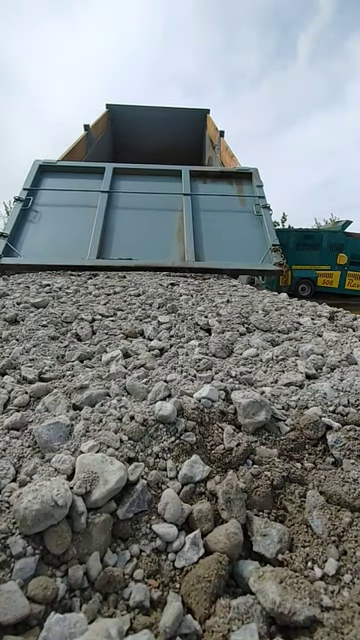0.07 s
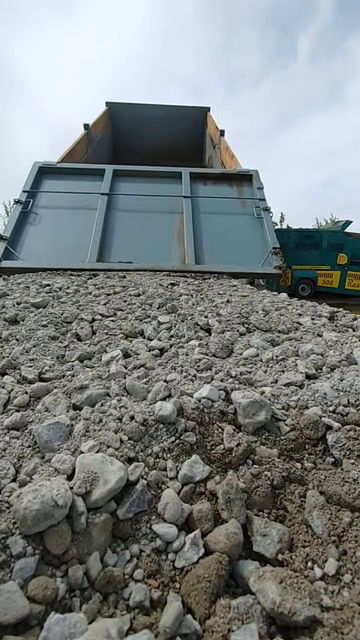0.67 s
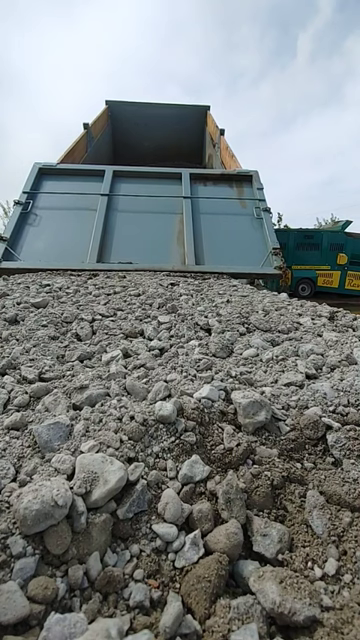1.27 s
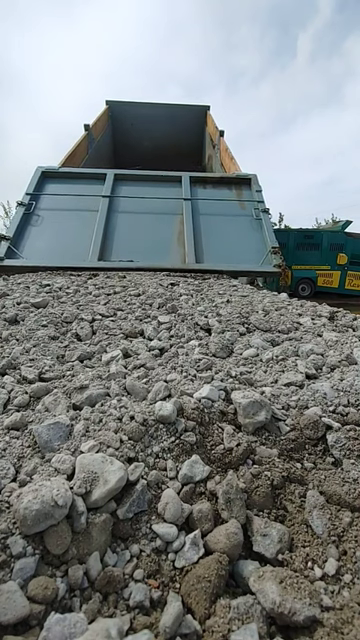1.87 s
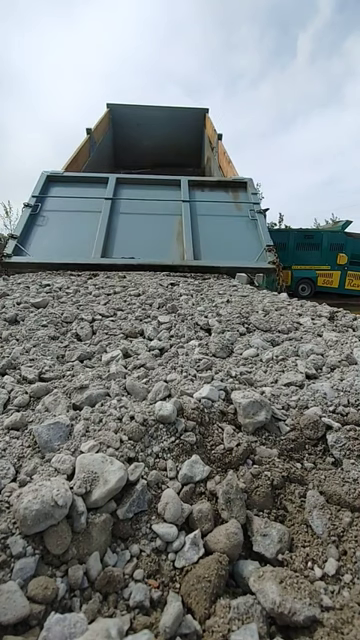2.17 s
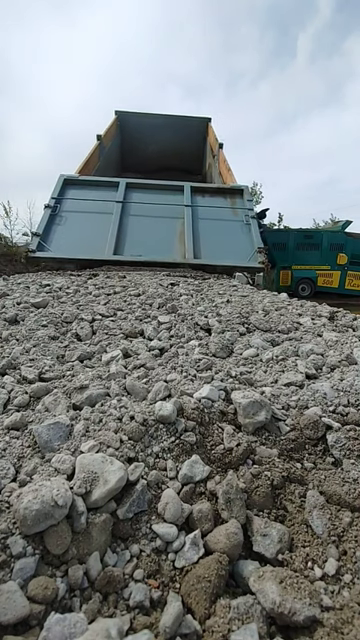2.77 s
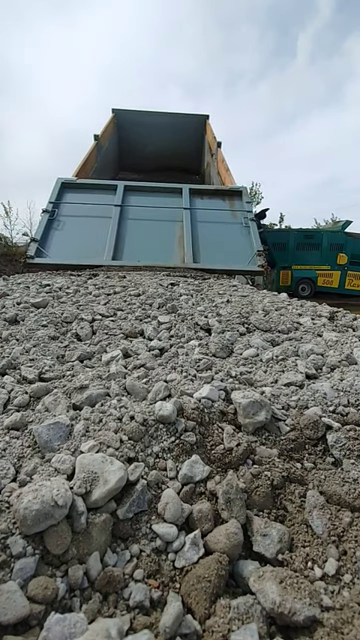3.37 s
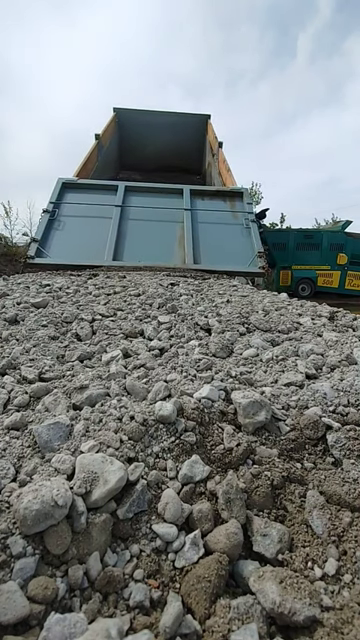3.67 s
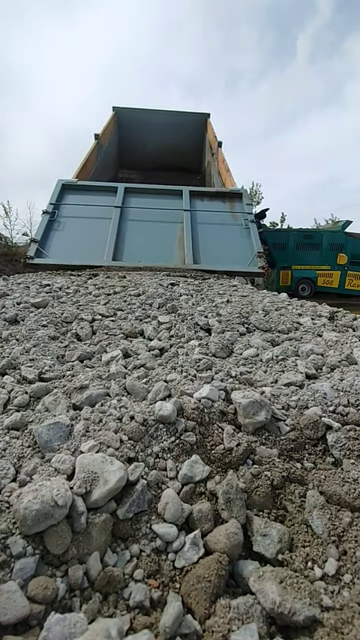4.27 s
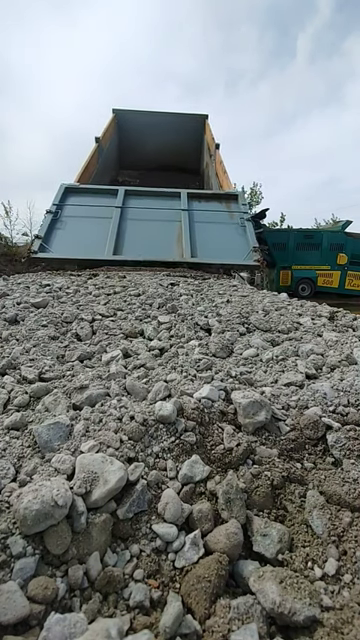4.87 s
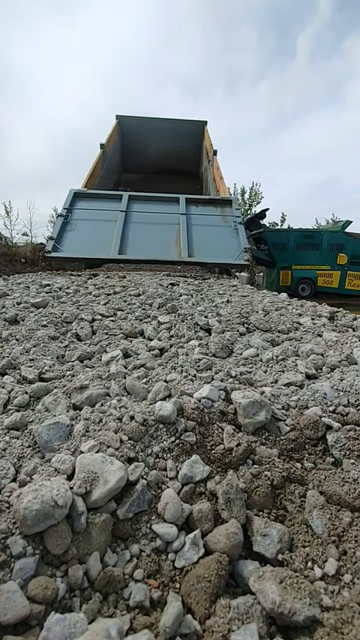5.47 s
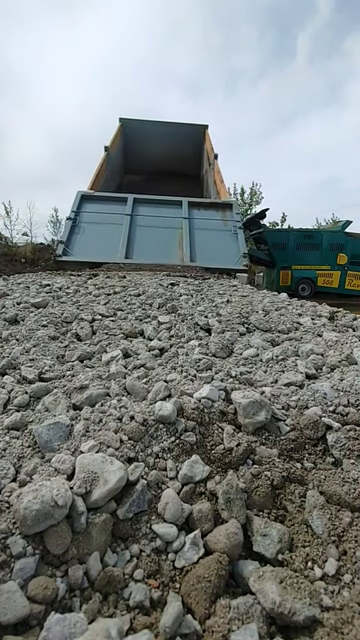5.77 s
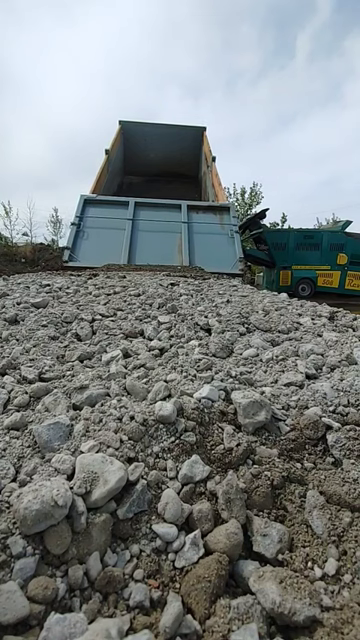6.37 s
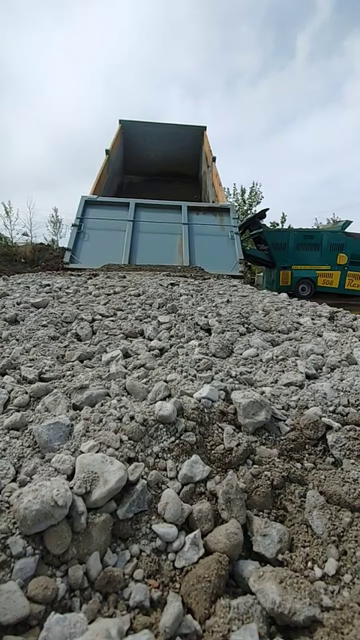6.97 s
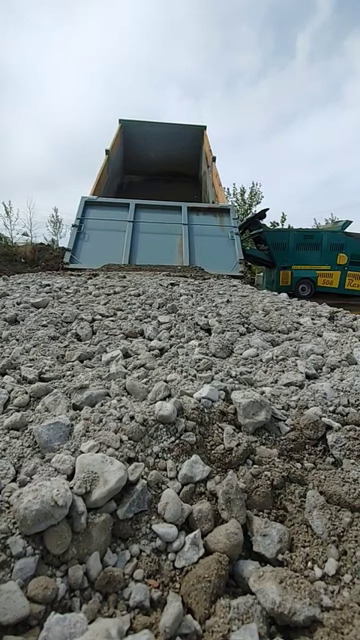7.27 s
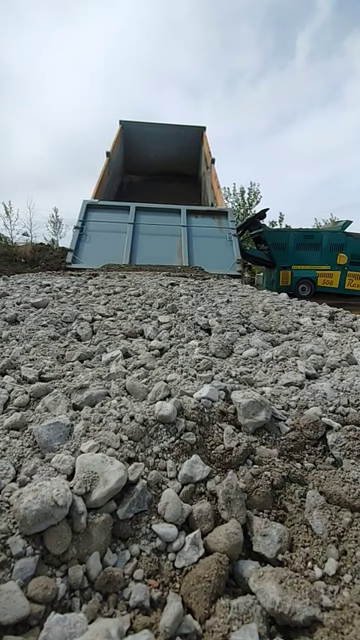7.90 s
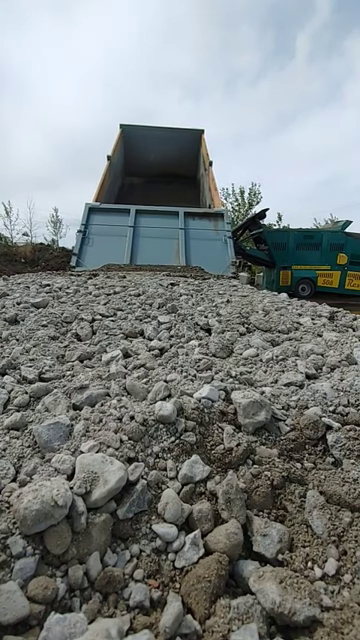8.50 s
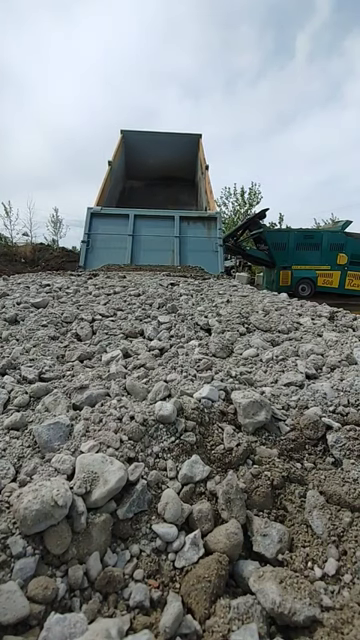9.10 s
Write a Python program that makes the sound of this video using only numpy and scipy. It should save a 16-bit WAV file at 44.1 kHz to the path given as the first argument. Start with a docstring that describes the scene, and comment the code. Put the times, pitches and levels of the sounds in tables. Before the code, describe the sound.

Wind thumps on a stereo microphone in the open, mainly on the left, over the steady drone of two distant diesels and a wavering, whistling hydraulic hiss. The slowly moving dump truck lets out a brief puff of air, then a louder double spurt, each with a faint, thin squeak. The gusts turn strong and rumbling around the second spurt and die down toward the end while the engines keep running.

```python
"""Two diesels hum and roar some way off, under a hydraulic hiss that swells and fades on the breeze.
A dump truck is creeping away from a gravel heap, bed raised, with the second engine running beside it.
An air valve spits, then shuts with a second spurt; the moving truck gives two thin squeaks.
The stereo microphone stands in the open and gusts buffet it, nearly always on the left port.
The right channel is duller and lags the left by about 4 ms."""
import sys
import numpy as np
from scipy import signal
from scipy.fft import rfft, irfft, next_fast_len
from scipy.io import wavfile
from scipy.ndimage import uniform_filter1d, map_coordinates

SR = 44100
rng = np.random.default_rng(int(sys.argv[2]) if len(sys.argv) > 2 else 0)


def wrap_up_sound(samples):
    """Save the sound to the file named by the first command line argument, as 16-bit audio."""
    columns = np.atleast_2d(samples).T
    # keep every value between -1 and 1, then stretch to whole-number steps
    tamed = np.clip(columns, -1, 1)
    steps = np.round(tamed * 32767).astype(np.int16)
    wavfile.write(sys.argv[1], SR, steps)


N = 407484


def amp(db):
    """Decibels to gain."""
    return 10 ** (np.asarray(db) / 20)


def unit(x):
    """Scale to rms 1."""
    return x / np.sqrt(np.mean(x ** 2) + 1e-20)


def clock():
    """The time of every sample, in seconds."""
    return np.arange(N) / SR


def along(points, hz):
    """Read (freq_hz, value) points at hz, on a log frequency axis."""
    freqs, values = np.transpose(points)
    return np.interp(np.log(hz + 1), np.log(freqs + 1), values)


def curves(rows):
    """One value per sample for each column after the time."""
    times, *columns = np.transpose(rows)
    return [np.interp(clock(), times, column) for column in columns]


def wobble(per_s):
    """A smooth random curve with per_s knots a second."""
    knots = rng.standard_normal(int(N * per_s / SR) + 4)
    return map_coordinates(knots, [clock() * per_s])


def swell(peak_s, half_length_s):
    """A bell-shaped envelope of height 1."""
    return np.exp(-.5 * ((clock() - peak_s) / half_length_s) ** 2)


def filtered(x, response):
    """Filter x by a complex response of frequency."""
    size = next_fast_len(N + SR // 2)
    return irfft(rfft(x, size) * response(np.fft.rfftfreq(size, 1 / SR)), size)[..., :N]


def coloured(x, spectrum):
    """Shape x by (freq_hz, level_db) points, at rms 1."""
    return unit(filtered(x, lambda hz: amp(along(spectrum, hz))))


def resonances(modes, hz):
    """Summed response of (centre_hz, width_hz, gain) modes."""
    return sum(gain * 1j * hz * width / (centre ** 2 - hz ** 2 + 1j * hz * width)
               for centre, width, gain in modes)


def rough_tone(turns, width_hz):
    """A narrow band of noise around a tone whose phase is given in turns, at rms 1."""
    fuzz = wobble(width_hz) + 1j * wobble(width_hz)
    return unit(np.real(fuzz * np.exp(2j * np.pi * turns)))


def rush(spectrum):
    """Stereo noise of rms 1, partly alike at the two ports."""
    # likeness of the machines at the left and right ports: freq_hz, coherence
    alike = [(80, 0.77), (500, 1), (1200, 0.9), (2500, 0.91), (3200, 0.54), (3800, 0.71), (5000, 0.39),
             (7500, 0.97), (9000, .1)]
    angle = lambda hz: np.arccos(np.clip(along(alike, hz), -1, 1)) / 2
    shares = lambda hz: np.array([np.cos(angle(hz)), np.sin(angle(hz))])
    mid, side = filtered(rng.standard_normal((2, N)), shares)
    return coloured(np.array([mid + side, mid - side]), spectrum)


def exhaust_hum(drift=0.0015, waver_db=2.0):
    """Exhaust tones of the two diesels, each drifting a little in pitch and level."""
    # engine tones: pitch_hz, rms_db
    tones = [(40.05, -83), (60.1, -63), (80.1, -49.5), (93.5, -50), (119.5, -64), (184.2, -53)]
    out = 0
    for hz, db in tones:
        turns = hz * np.cumsum(1 + drift * wobble(4.96)) / SR + rng.random()
        level = amp(db - waver_db * wobble(5.8))
        out = out + level * np.sqrt(2) * np.sin(2 * np.pi * turns)
    return out


def roar_and_hiss(firing_hz=80.3, throb_db=0.9, flutter_db=0.85, sway_db=.5, churn_hz=45):
    """Engine roar throbs with the firing; oil hisses through a valve in a band that creeps upward."""
    # the machines as the breeze carries them, before each layer's gain: time_s, roar_db, hiss_db, fizz_db
    carried = [(0, -47, -40, -46), (0.52, -48.5, -42.5, -48.5), (1.03, -49, -40.5, -48),
               (1.33, -48, -44, -54), (1.68, -50.5, -46, -58), (2.05, -45, -39, -49), (2.26, -43, -36, -44),
               (2.76, -44, -35.5, -42), (2.92, -43, -37.5, -47.5), (3.1, -48.5, -45, -55),
               (3.15, -49, -43, -52.5), (3.4, -45.5, -37.5, -45.5), (4.45, -48, -37.5, -47),
               (5.3, -47.5, -39.5, -48.5), (5.55, -46.5, -37, -46), (6.37, -51.5, -41.5, -52),
               (6.98, -54, -43.5, -56.5), (7.82, -50.5, -43.5, -55), (7.88, -50.5, -41, -54),
               (9.24, -50.5, -44, -53.5)]
    roar_gain_db, hiss_gain_db, fizz_gain_db = 10, 5, 9.5
    roar_db, hiss_db, fizz_db = curves(carried) + sway_db * wobble(4)

    # spectrum of the engine roar: freq_hz, level_db
    roar_spectrum = [(20, -26), (45, -16), (75, -15), (125, -10), (185, -2.5), (240, -2), (330, 2),
                     (460, 3), (700, -2), (950, -4.5), (1400, -4.5), (2000, -10.5), (3200, -7.5),
                     (5000, -57)]
    throb = throb_db * np.cos(2 * np.pi * firing_hz * clock())
    roar = amp(roar_db + roar_gain_db + throb + flutter_db * wobble(14)) * rush(roar_spectrum)

    # spectrum of the hydraulic hiss: freq_hz, level_db
    hiss_spectrum = [(1300, -30), (1950, -15.5), (2250, -6.5), (2450, -2), (2600, -2), (2750, -2),
                     (3000, -9.5), (3400, -21.5), (5000, -62)]
    # centre of the hiss, whose swing about its mean shifts the band: time_s, pitch_hz
    hiss_pitch = [(0, 2523), (3.7, 2536), (4.2, 2610), (6, 2618), (7.5, 2635), (9.24, 2661)]
    centre_hz, = curves(hiss_pitch)
    shift_hz = centre_hz - centre_hz.mean() + churn_hz * wobble(12)
    glide = np.exp(2j * np.pi * np.cumsum(shift_hz) / SR)
    hiss_level = amp(hiss_db + hiss_gain_db + flutter_db * wobble(20))
    hiss = hiss_level * np.real(signal.hilbert(rush(hiss_spectrum)) * glide)

    # a thinner hiss that fades as the truck moves off: time_s, level_db
    thin_levels = [(0, -42.5), (1, -44), (1.6, -50), (2.5, -41), (3.2, -48), (4, -54), (9.24, -60)]
    # its narrow spectrum: freq_hz, level_db
    thin_spectrum = [(3200, -23), (3750, -4.5), (4030, -0.5), (4350, -4.5), (4900, -51)]
    thin = amp(curves(thin_levels)[0] + np.array([[0], [-6]])) * rush(thin_spectrum)  # softer at right

    # spectrum of the high fizz: freq_hz, level_db
    fizz_spectrum = [(1800, -46), (3000, 0), (3500, 0.5), (4100, 0), (4700, -4), (5850, -7), (6500, -3.5),
                     (7600, -3.5), (10000, -14), (11500, -9.5), (15500, -14)]
    # the right channel's high fizz drops faster when it is faint
    extra_slope, balanced_at_db = 0.37, -49.5
    balance_db = np.outer([0, 1], extra_slope * (fizz_db - balanced_at_db))
    fizz = amp(fizz_db + fizz_gain_db + balance_db + 0.78 * wobble(17)) * rush(fizz_spectrum)

    # panels and ducts that colour the machines: centre_hz, width_hz, added_gain
    panels = [(805, 180, 0.12), (1070, 63, 0.33), (1420, 100, 0.039), (5260, 430, 0.39), (6450, 280, 0.29),
              (7520, 330, 0.24)]
    return filtered(roar + hiss + thin + fizz, lambda hz: 1 + resonances(panels, hz))


def valve_song(width_hz=100, waver_hz=40, waver_per_s=9, swell_db=1.3):
    """The oil valve sings: a rasping whistle that wavers on the crest of the hydraulic hiss."""
    # course of the whistle: time_s, level_db, pitch_hz
    song = [(0, -41, 2530), (0.5, -41.5, 2528), (1.2, -41, 2537), (1.6, -47, 2561), (2.6, -36, 2631),
            (3.2, -46, 2619), (4.2, -42, 2718), (4.85, -43, 2559), (5.65, -39, 2632), (6.5, -48, 2663),
            (7.5, -41.5, 2712), (7.7, -46, 2727), (7.95, -41, 2721), (8.35, -50, 2708), (8.8, -42, 2740),
            (9.24, -50, 2740)]
    db, hz = curves(song)
    hz = hz + waver_hz * wobble(waver_per_s)
    return amp(db + swell_db * wobble(waver_per_s)) * rough_tone(np.cumsum(hz) / SR, width_hz)


def gust(start_s, length_s, rise_s=0.0058, fall_db_per_s=600):
    """A gust of height 1 rises quickly, holds and drops away."""
    age = clock() - start_s
    rise = np.clip(age / rise_s + .5, 0, 1)
    return rise * amp(-fall_db_per_s * np.clip(age - length_s, 0, .5))


def buffet(force, pushes, bass_gain, eddy_hz, hard_db=-18, bass_hz=130, smooth_s=0.02, evenness=0.64):
    """Turbulence on one port: a running force and brief pushes, each with its own eddy size."""
    # rumble of a light flow over the port: freq_hz, level_db
    soft_wind = [(15, -25), (30, -27), (60, -6), (110, -4), (165, 3.5), (260, -2), (400, -16.5),
                 (600, -32.5), (900, -48), (1500, -77)]
    # rumble of a hard flow: freq_hz, level_db
    hard_wind = [(15, -29), (30, -21), (110, -5), (165, 4.5), (260, 3.5), (400, -1.5), (600, -14.5),
                 (900, -33), (1400, -53), (2500, -76)]
    usual_hz = 250  # eddy pitch that leaves both spectra unshifted
    speed = np.ones(N) * eddy_hz / usual_hz
    for peak_s, db, hz, half_length_s in pushes:
        bell = swell(peak_s, half_length_s)
        force = np.maximum(force, amp(db) * bell)
        reach = np.minimum(2 * bell, 1)
        speed = speed + reach * (hz / usual_hz - speed)
    eddies = rng.standard_normal(N)
    travel = [np.cumsum(speed)]
    passing = lambda spectrum: map_coordinates(coloured(eddies, spectrum), travel, mode="mirror")
    # the harder the push, the smaller and brighter the eddies
    hardness = force ** 2 / (force ** 2 + amp(hard_db) ** 2)
    flow = (1 - hardness) * passing(soft_wind) + hardness * passing(hard_wind)
    bass = filtered(flow, lambda hz: 1 / (1 + (hz / bass_hz) ** 4))
    flow = flow + (bass_gain - 1) * bass
    # the push, more than chance, sets the strength of each eddy
    power = uniform_filter1d(flow ** 2, int(smooth_s * SR) + 1)
    power = np.abs(uniform_filter1d(power, SR // 300)) + 1e-6
    return force * unit(flow / power ** (evenness / 2))


def wind(eddy_hz=255.5, pitch_scatter=.09, gust_gain_db=0.17, lumps_db=3.0, ceiling=0.99):
    """Wind right on the microphone: lumpy gusts and sharp slaps at left, a few puffs at right."""
    # steady breeze on the left port: time_s, level_db
    breeze = [(0, -40.5), (1.1, -39), (1.5, -50), (2.2, -39.5), (3.15, -38), (3.35, -26.5), (4.8, -28),
              (5.65, -28.5), (6.2, -28), (6.5, -31), (7.08, -37), (7.25, -28), (7.7, -32), (8, -42),
              (8.8, -38.5), (9.24, -43)]
    # gusts on the left port: start_s, length_s, level_db
    gusts = [(0, 0.11, -28), (0.345, 0.022, -22.5), (0.646, 0.11, -27.5), (0.772, 0.11, -31),
             (0.985, 0.13, -30.5), (1.192, 0.021, -35.5), (1.695, 0.036, -33.5), (1.773, 0.032, -28.5),
             (2.193, 0.078, -32.5), (2.387, 0.049, -30), (2.735, 0.043, -26.5), (2.897, 0.13, -29),
             (3.044, 0.055, -24), (3.198, 0.1, -25), (3.32, 0.079, -18.5), (3.466, 0.11, -18.5),
             (3.668, 0.069, -20.5), (3.797, 0.38, -21.5), (4.242, 0.084, -19), (4.36, 0.2, -22.5),
             (4.574, 0.29, -20), (4.915, 0.11, -18), (5.111, 0.35, -24), (5.515, 0.06, -22),
             (5.749, 0.27, -20), (6.008, 0.19, -19), (6.276, 0.12, -20), (6.55, 0.34, -21.5),
             (6.941, 0.098, -21.5), (7.12, 0.079, -20), (7.234, 0.12, -22), (7.36, 0.085, -25.5),
             (7.503, 0.23, -21), (7.758, 0.07, -20.5), (7.85, 0.1, -31), (8.057, 0.16, -28),
             (8.302, 0.064, -34.5), (8.404, 0.025, -26), (8.468, 0.019, -30.5), (8.929, 0.055, -29.5)]
    flow = amp(curves(breeze)[0])
    for start_s, length_s, db in gusts:
        flow = np.maximum(flow, amp(db + gust_gain_db) * gust(start_s, length_s))
    lumpy_flow = flow * amp(lumps_db * wobble(65))
    wavering_hz = eddy_hz * np.exp(pitch_scatter * wobble(40))

    # puffs that reach the right port: peak_s, level_db, eddy_hz, half_length_s
    puffs = [(0.683, -31, 100.2, 0.019), (2.922, -23.5, 499, 0.02), (2.958, -24, 463, 0.021),
             (2.996, -33, 72.7, 0.015), (3.271, -20, 167, 0.021)]
    right = buffet(np.zeros(N), puffs, bass_gain=0.4, eddy_hz=eddy_hz)

    # single eddies that slap the left port: peak_s, level_db, eddy_hz, half_length_s
    slaps = [(0.085, -17, 180, .011), (0.142, -24, 125, 0.0066), (0.357, -15, 199, 0.005),
             (0.663, -22.5, 200.4, .013), (0.732, -19, 166, 0.0088), (0.792, -21, 206, 0.0036),
             (0.895, -21, 171.2, 0.0041), (1.004, -19.5, 190.4, 0.0047), (1.709, -22, 200.2, 0.0051),
             (1.798, -22, 190.3, 0.0051), (2.124, -25, 170.6, 0.0044), (2.207, -26, 169.6, 0.0059),
             (2.422, -24, 175, 0.0068), (2.739, -16.5, 202.2, 0.0061), (2.779, -22, 200.3, 0.0052),
             (2.925, -23, 374, 0.013), (2.957, -32, 419.2, 0.013), (3.047, -16, 183, 0.0037),
             (3.096, -16, 154.5, 0.011), (3.219, -22, 160.5, 0.0044), (3.351, -12, 199, 0.0067),
             (3.404, -13.5, 178, 0.0089), (3.473, -12, 279.5, 0.0034), (3.526, -8, 212, 0.0097),
             (3.583, -12, 270, 0.0077), (3.705, -11.5, 222.8, 0.0042), (3.735, -8, 208.5, 0.00508),
             (3.746, -13, 200, .003), (3.754, -9.5, 235, 0.0044), (3.883, -15.5, 272.7, 0.0066),
             (3.913, -19.5, 309, .004), (3.96, -14, 195.3, 0.0062), (4.046, -12.5, 375.7, 0.0053),
             (4.223, -13.5, 246.7, .003), (4.266, -8.5, 349.2, 0.0051), (4.288, -7.5, 285, 0.0053),
             (4.345, -18, 197, 0.0041), (4.395, -16, 175.4, 0.0047), (4.454, -14, 151.8, 0.0091),
             (4.495, -16, 214, 0.0052), (4.535, -19, 203.6, 0.0039), (4.557, -19, 520, .0025),
             (4.566, -10.5, 349, 0.0029), (4.585, -6.5, 262.5, 0.0039), (4.608, -13, 235, 0.0028),
             (4.643, -9, 218, 0.0031), (4.673, -8, 224.8, 0.0041), (4.689, -15.5, 379.7, 0.00302),
             (4.704, -10, 258.8, .0025), (4.714, -9, 256, 0.0038), (4.739, -15, 379.4, 0.0042),
             (4.775, -13, 338, .003), (4.786, -9, 263, 0.0039), (4.859, -7, 170.9, 0.0037),
             (4.922, -18.5, 320.4, 0.0038), (4.939, -12, 217.6, 0.0042), (4.963, -13.5, 289, 0.0039),
             (4.999, -8, 249.5, 0.0032), (5.01, -10.5, 245.9, 0.0036), (5.067, -16, 217.5, .004),
             (5.122, -18, 216.2, 0.0031), (5.139, -11, 245, 0.0038), (5.211, -11, 219.6, 0.005),
             (5.238, -13, 185.6, .004), (5.297, -13, 197.2, 0.0035), (5.314, -12.5, 226.3, 0.0028),
             (5.334, -12.5, 182.8, 0.0035), (5.384, -15.5, 201.7, .003), (5.407, -13.5, 235.2, 0.011),
             (5.563, -14, 234.8, 0.008), (5.802, -15, 244, 0.0039), (5.814, -14.5, 370, 0.0032),
             (5.903, -13, 274.8, 0.0038), (5.978, -10.5, 273.4, 0.0041), (6.018, -12.5, 359.4, 0.0051),
             (6.067, -10, 213.7, 0.0081), (6.084, -12, 247.7, 0.0039), (6.095, -8.5, 399.8, 0.00407),
             (6.157, -16, 370, 0.0034), (6.165, -11, 189.9, .004), (6.182, -9, 189.7, 0.0058),
             (6.22, -18, 189.3, 0.0041), (6.235, -14.5, 189, .004), (6.318, -11.5, 370.4, 0.0033),
             (6.369, -14, 225, 0.009), (6.54, -18, 195.7, .004), (6.592, -13.5, 239.4, 0.0051),
             (6.7, -11.5, 280, 0.011), (6.738, -16.5, 220.3, 0.0041), (6.811, -12, 238.4, 0.0076),
             (6.854, -13.5, 172.5, 0.0045), (6.973, -11, 230.9, 0.0045), (7.028, -13.5, 249.7, 0.0044),
             (7.128, -11, 284.2, 0.0048), (7.191, -13.5, 236.8, 0.0037), (7.286, -14.5, 278.6, 0.0042),
             (7.298, -17, 329, 0.003), (7.317, -13, 422, 0.0051), (7.339, -15.5, 358, .004),
             (7.352, -15, 258, .003), (7.415, -14.5, 260.5, .004), (7.465, -18, 188, .003),
             (7.512, -15, 246, 0.0028), (7.555, -16.5, 315.4, 0.0038), (7.602, -13, 200.3, .005),
             (7.622, -14.5, 196.3, 0.0038), (7.687, -14, 340, .0035), (7.698, -12.5, 459.7, .005),
             (7.717, -14, 291, 0.0043), (7.73, -13.5, 240, .003), (7.742, -14, 270, 0.0027),
             (7.786, -15, 242, 0.0035), (8.072, -22, 191.5, 0.0043), (8.107, -16, 252.7, 0.0045),
             (8.158, -21.5, 220, 0.0045), (8.429, -20, 220, 0.0064), (8.946, -24.5, 204.6, 0.0097)]
    # lesser slaps stray in at random, most often in the strongest flow
    stray_per_s, over_flow_db, half_length_s = 4, 3, 0.004012
    stray_samples = np.flatnonzero(rng.random(N) < stray_per_s / SR * unit(flow))
    strays = [(i / SR, 20 * np.log10(flow[i]) + over_flow_db, eddy_hz, half_length_s)
              for i in stray_samples]
    # weight of the wind's bass on the left port: time_s, gain_db
    wind_bass = [(0, -0.5), (1.5, -7), (2.6, -6), (3.1, -1.5), (3.8, 3), (4.6, -2), (6, 2), (6.8, -8),
                 (7.7, -5), (8.1, -8.5), (9.24, -6.5)]
    left = buffet(lumpy_flow, slaps + strays, amp(curves(wind_bass)[0]), wavering_hz)
    # the port rounds off the hardest pushes
    left = left / (1 + np.abs(left / ceiling) ** 4) ** (1 / 4)
    return np.array([left, right])


def air_valve(attack_s=0.0013, sag_db_per_s=110, t60_s=0.16, nozzle_db=-2, ring_width_hz=100):
    """Each burst of air sags as the pressure drops, then dies away among the steel walls."""
    # valve bursts: start_s, level_db, length_s, treble_tilt_db_per_octave, ring_hz, ring_db
    bursts = [(0.75, -27.5, 0.045, 4, 4080, -9), (3.6354, -15.5, .004, 2, 7290, -14),
              (3.639, -10.5, 0.0052, -0.5, 3840, -2), (3.661, -15.5, 0.028, 0, 3510, -12),
              (3.7114, -21.5, .002, -2, 3930, 1), (3.7195, -16, 0.0059, -2, 2470, 1.5)]
    # spectrum of the air jet: freq_hz, level_db
    jet_spectrum = [(400, -34.5), (800, -9), (1900, -14), (2500, -1), (3200, 2.5), (3900, 2.5), (4700, -3),
                    (7500, -3.5), (10000, -17), (12000, -9), (15500, -16)]
    # nozzle resonances that the jet rings: centre_hz, width_hz, level_db
    nozzle = [(1386, 48, 5), (2367, 110, -3), (3460, 82, -14), (3740, 73, 4), (4000, 150, -0.5),
              (4290, 90, -20), (5300, 140, -13), (7540, 30, -28)]
    nozzle_modes = [(hz, width_hz, amp(db)) for hz, width_hz, db in nozzle]
    drive = [(500, -18), (1300, -11), (8000, 5.5), (12000, -5)]  # noise that rings them: freq_hz, level_db
    ringing = lambda modes: unit(filtered(rush(drive), lambda hz: resonances(modes, hz)))
    out = 0
    for start_s, db, length_s, tilt, ring_hz, ring_db in bursts:
        jet = rush(jet_spectrum) + amp(nozzle_db) * ringing(nozzle_modes)
        jet = jet + amp(ring_db) * ringing([(ring_hz, ring_width_hz, 1)])
        jet = unit(filtered(jet, lambda hz: amp(tilt * np.log2(np.maximum(hz, 2000) / 2000))))
        age = np.maximum(clock() - start_s, 0)
        sag_db = sag_db_per_s * np.minimum(age, length_s)
        tail_db = 60 * np.maximum(age - length_s, 0) / t60_s
        out = out + jet * (1 - np.exp(-age / attack_s)) * amp(db - sag_db - tail_db)
    return out


def squeaks(width_hz=120):
    """Brief, thin squeaks from the moving truck, each a slightly rough high tone."""
    # metal squeaks: peak_s, level_db, pitch_hz, half_length_s
    events = [(0.785, -33, 13700, .018), (3.494, -29, 13600, .02)]
    return sum(amp(db) * swell(peak_s, half_length_s) * rough_tone(hz * clock(), width_hz)
               for peak_s, db, hz, half_length_s in events)


def scene():
    """Machines at a distance, wind at the microphone."""
    return exhaust_hum() + roar_and_hiss() + valve_song() + air_valve() + squeaks() + wind()


def record(dry):
    """Two unlike channels, the right one duller and about 4 ms late, both cut off in the top treble."""
    # response that both microphone ports share: freq_hz, gain_db
    port = [(7900, -0.5), (8500, -8.5), (9100, -22.5), (9900, -3.5), (11400, -2.5), (12200, -5),
            (12900, -20), (15000, -16.5)]
    # response of the right channel against the left: freq_hz, gain_db
    right_response = [(80, -2.5), (400, -2), (900, 1.5), (1900, -1.5), (2600, -5), (3200, -16.5),
                      (4000, -13.5), (5000, -12), (7000, -7.5), (8000, -15), (8600, -43), (15000, -31)]
    # phase by which the right channel trails, beyond its lag: freq_hz, phase_rad
    right_phase = [(200, -0.12), (450, -0.27), (820, -0.15), (1000, 0.094), (1700, 0.53), (2000, 1.13),
                   (2750, 0.95), (3100, 0.83), (4100, -0.68), (5000, -0.18), (6700, 0.11), (7300, 1)]
    right_lag_s, top_hz = .00436, 15200
    trailing = lambda hz: 2 * np.pi * hz * right_lag_s + along(right_phase, hz)
    right = lambda hz: amp(along(right_response, hz)) * np.exp(-1j * trailing(hz))
    channels = lambda hz: amp(along(port, hz)) * np.array([np.ones_like(hz), right(hz)])
    return filtered(dry, lambda hz: channels(hz) * (hz < top_hz))


dry = scene()
out = record(dry)
wrap_up_sound(out)
```